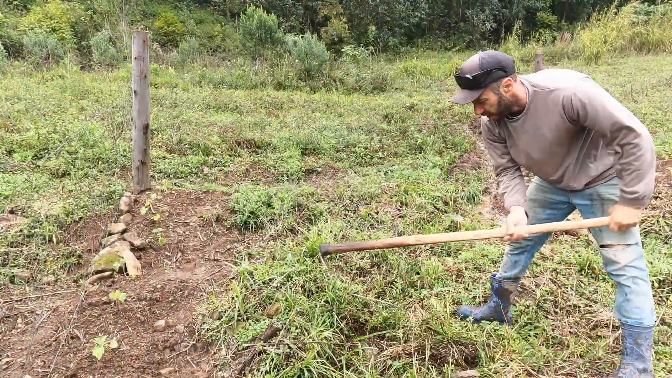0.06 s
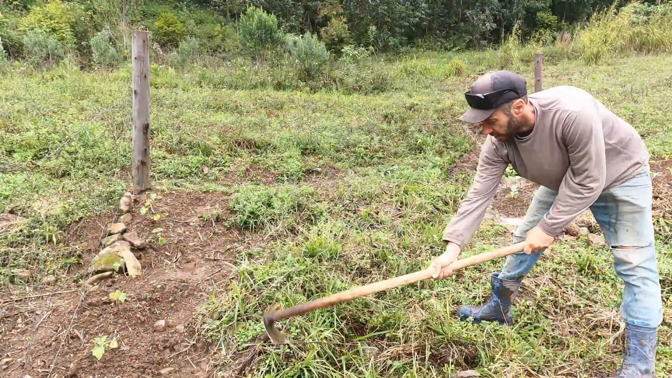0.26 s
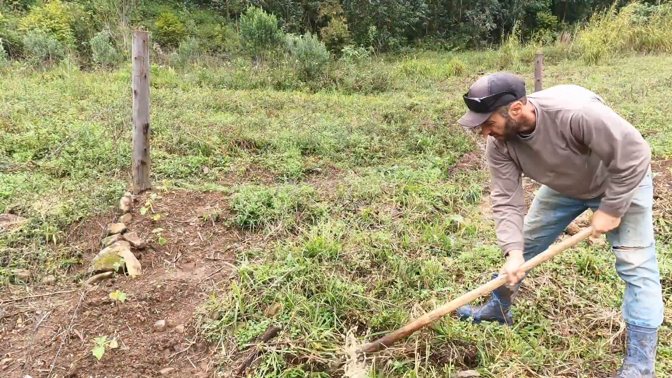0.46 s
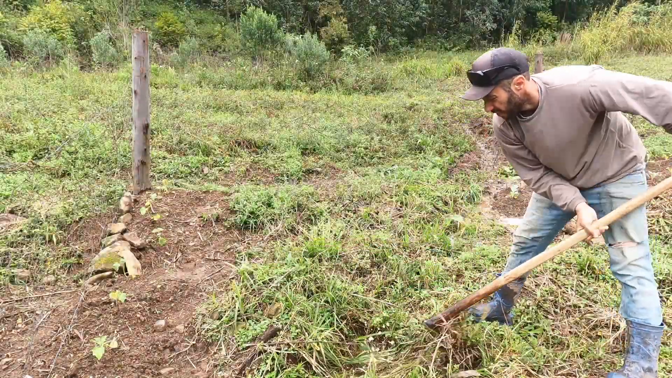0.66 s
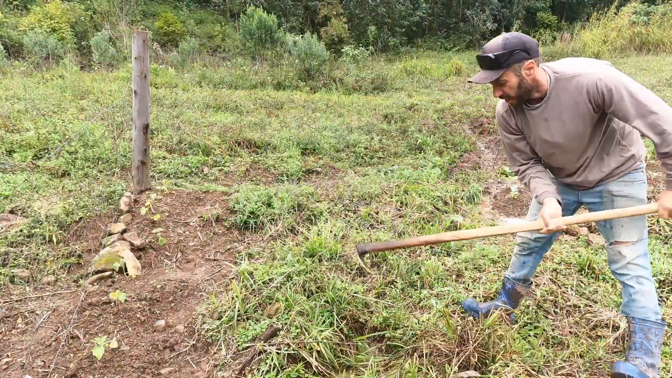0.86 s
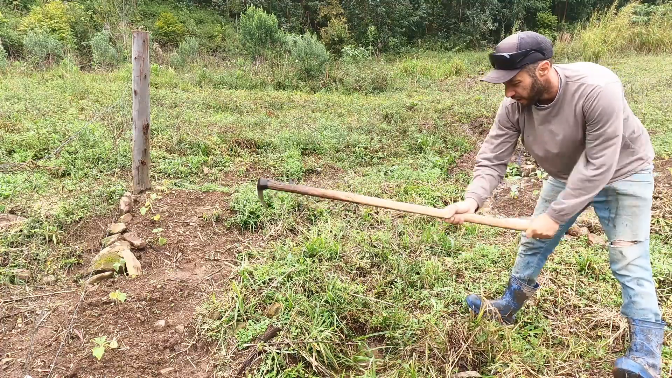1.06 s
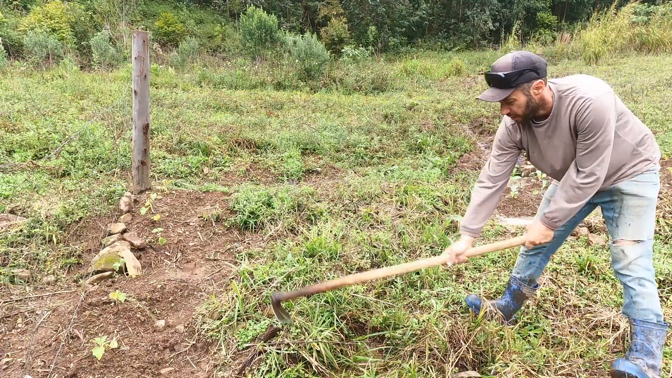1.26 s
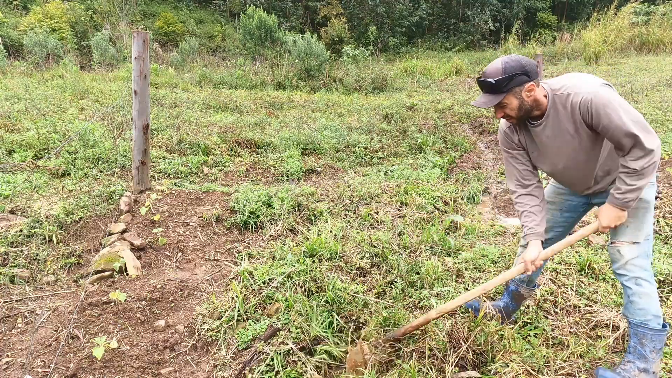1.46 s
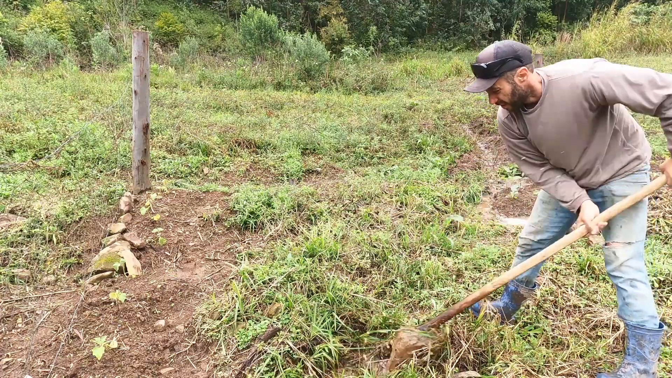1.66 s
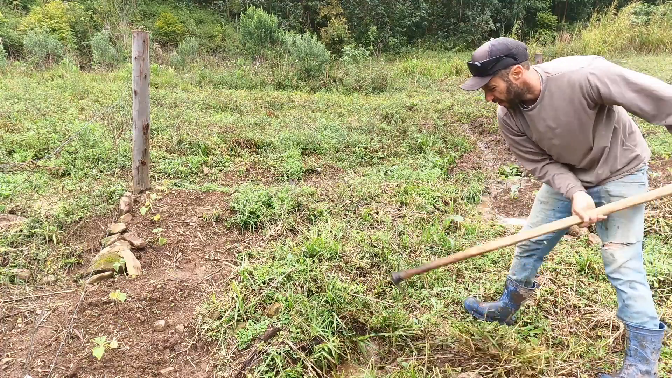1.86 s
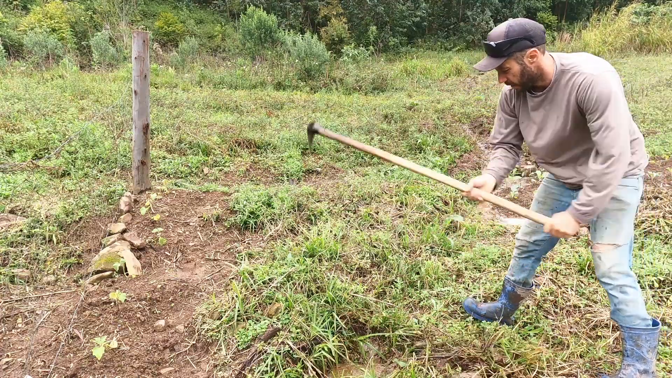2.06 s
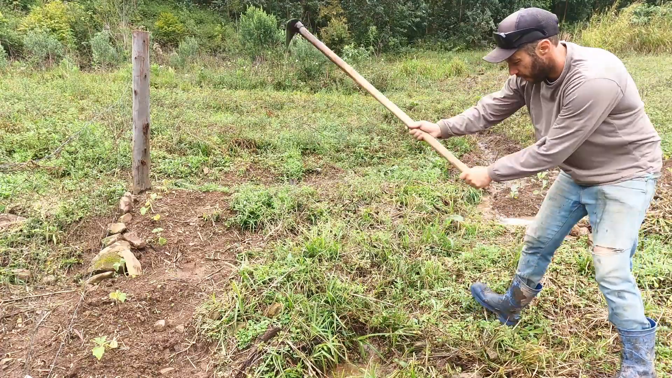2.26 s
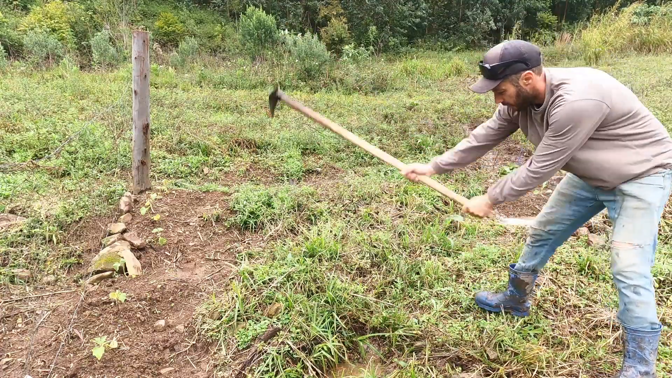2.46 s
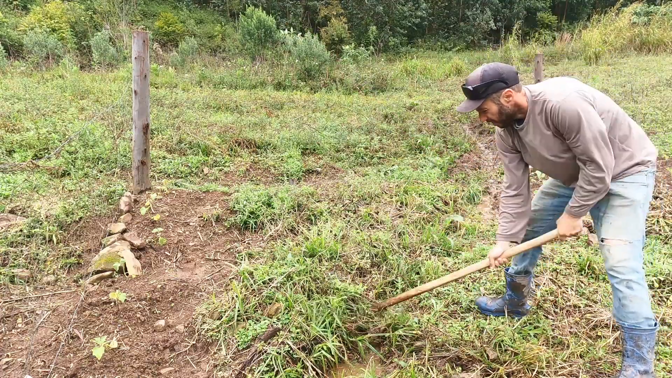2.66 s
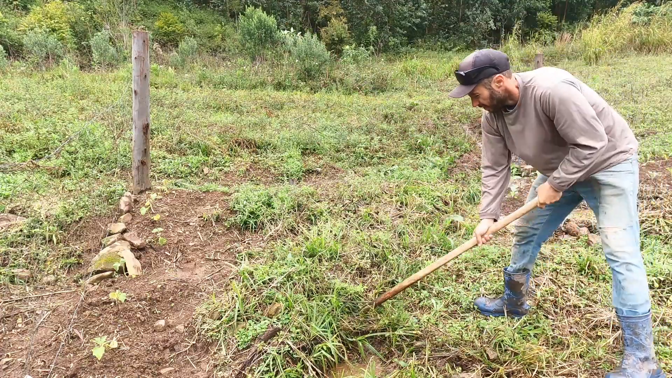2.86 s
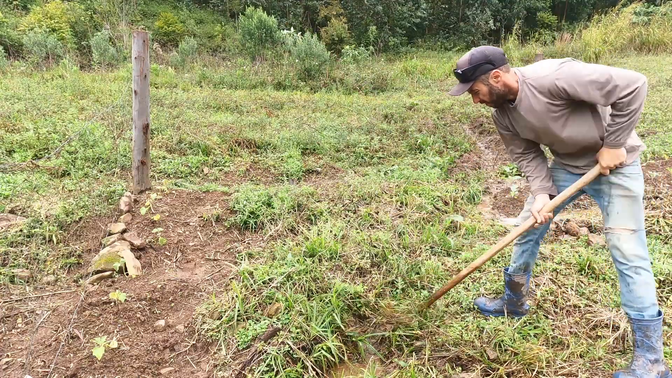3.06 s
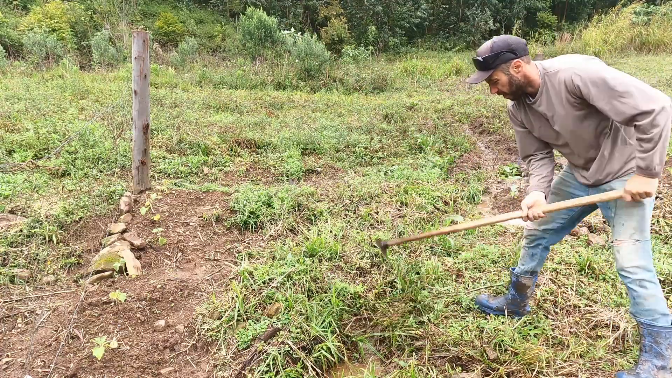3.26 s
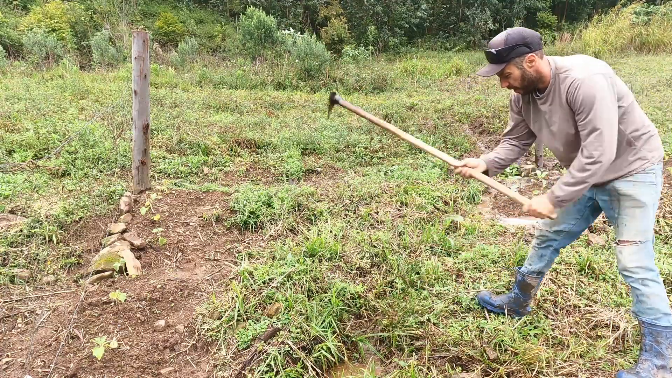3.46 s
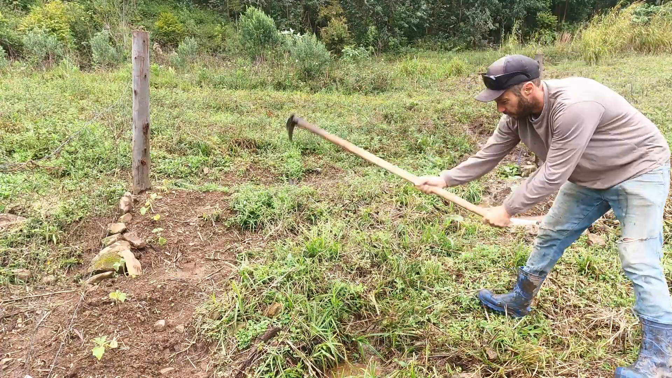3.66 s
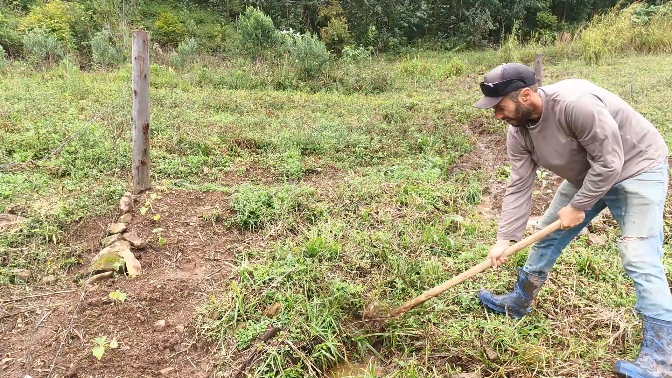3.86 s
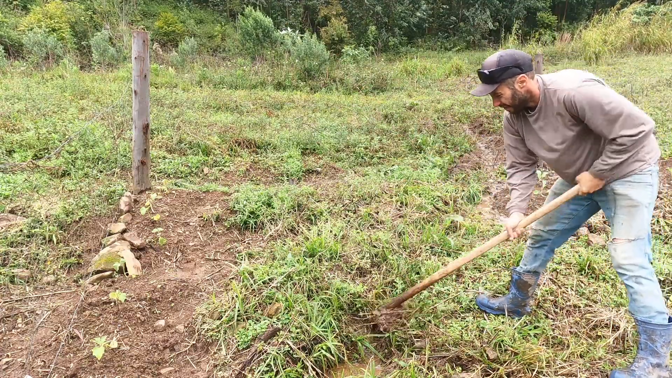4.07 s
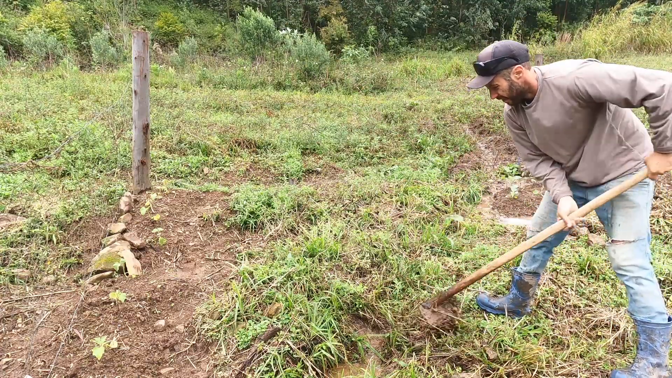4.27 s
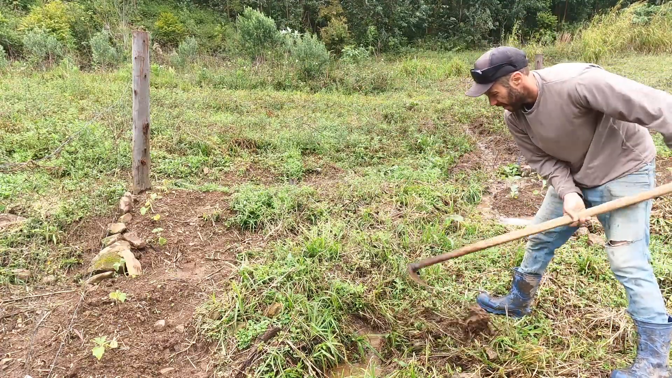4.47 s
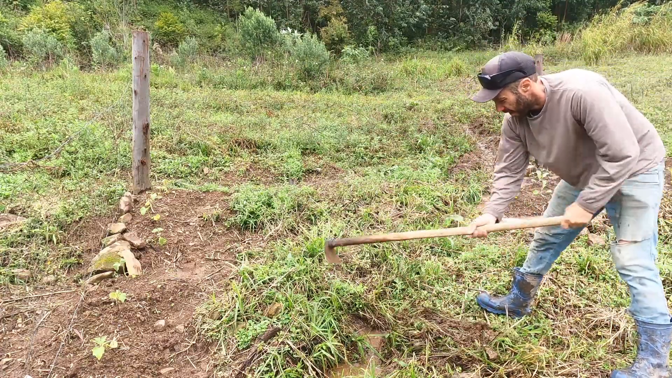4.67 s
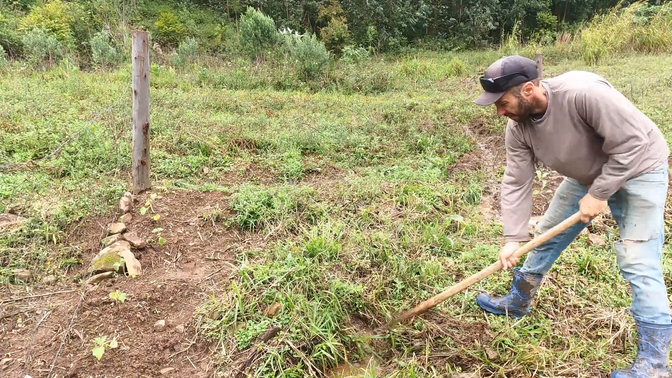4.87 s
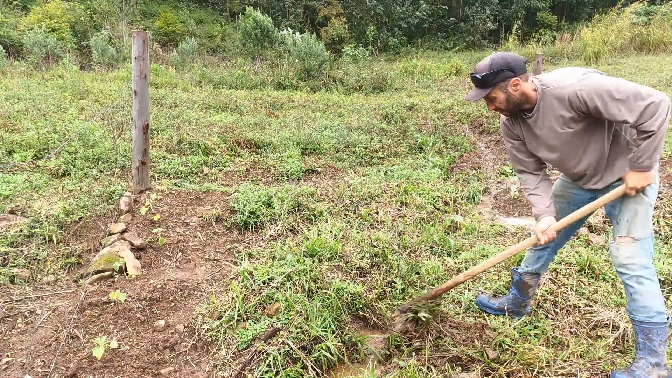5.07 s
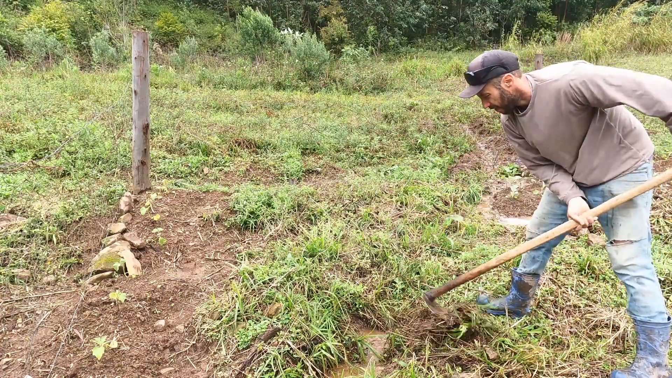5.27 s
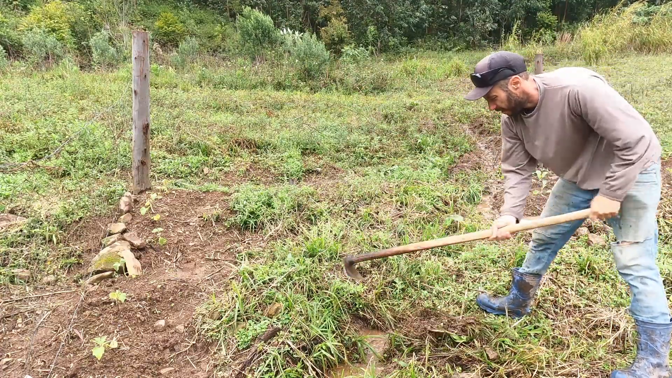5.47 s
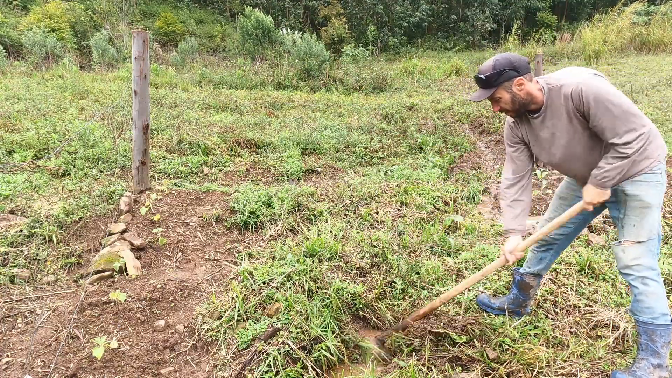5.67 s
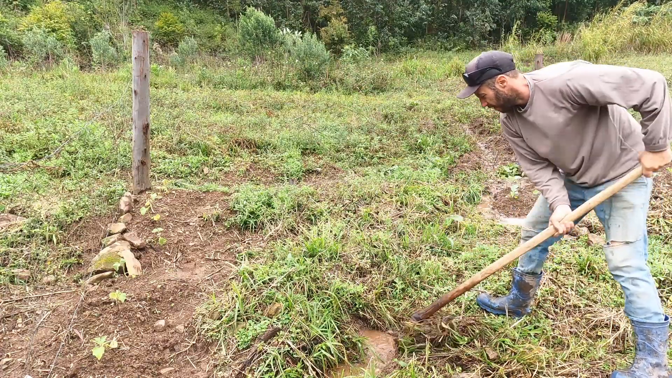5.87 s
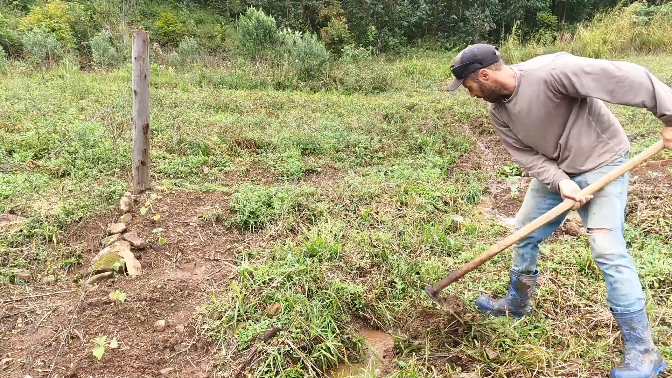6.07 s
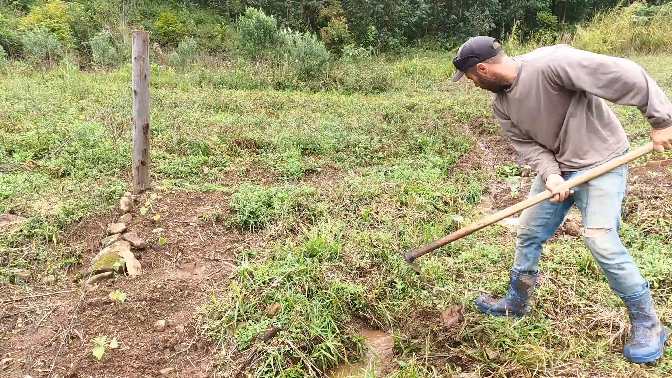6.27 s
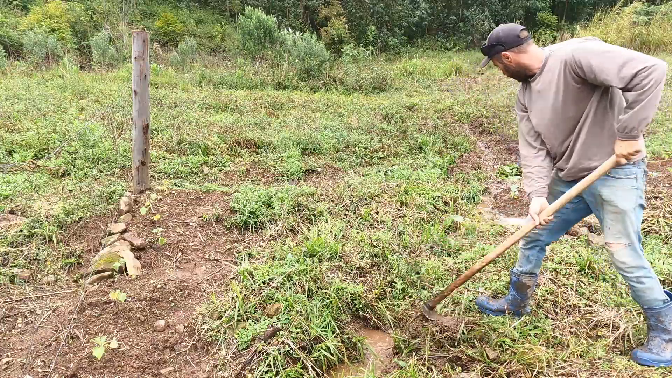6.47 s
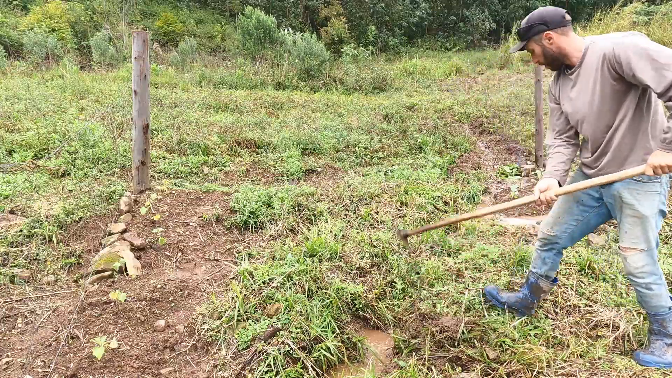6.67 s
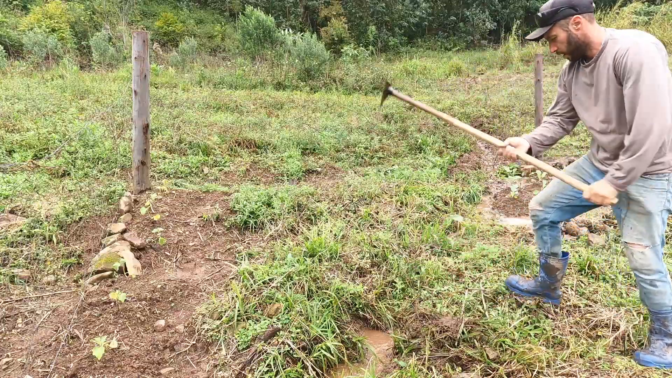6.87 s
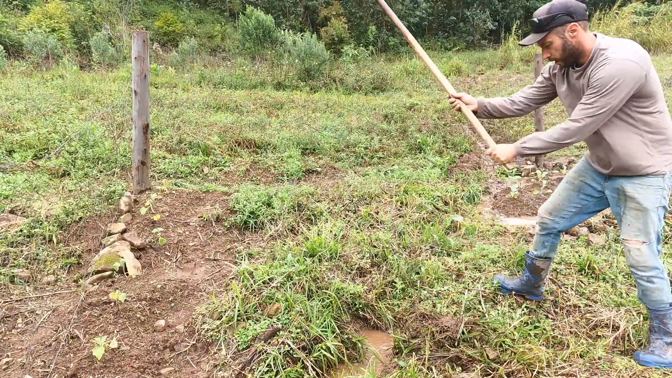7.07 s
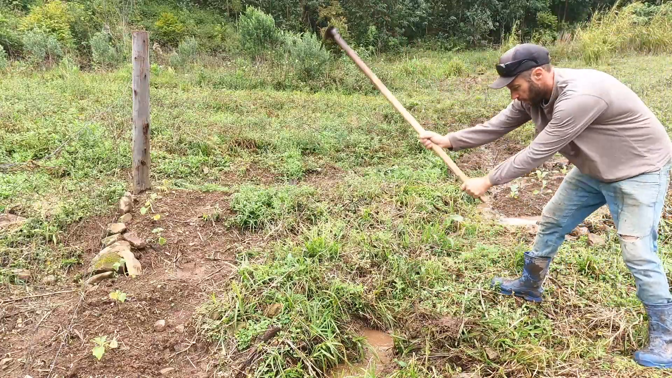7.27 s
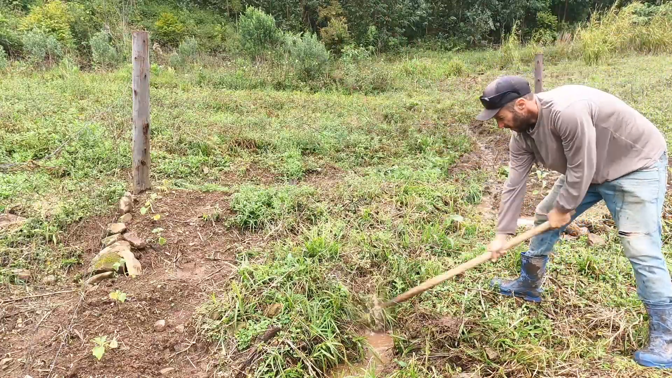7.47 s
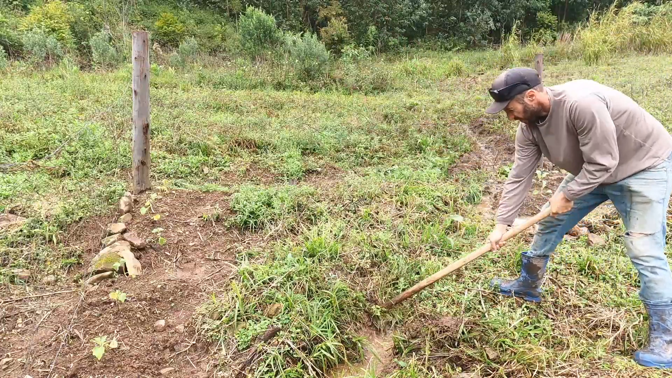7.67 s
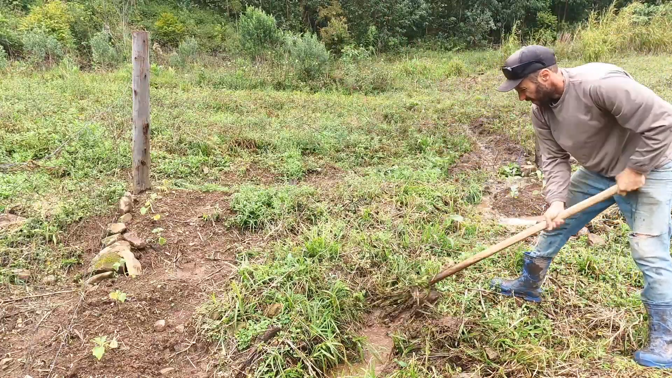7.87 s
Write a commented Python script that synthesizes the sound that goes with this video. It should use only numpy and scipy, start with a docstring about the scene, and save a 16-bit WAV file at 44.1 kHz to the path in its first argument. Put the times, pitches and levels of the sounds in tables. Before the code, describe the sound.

Wet, thudding hoe blows tear through turf at uneven intervals, followed by gritty scrapes, with early wind rumble, soft hiss and faint high birdsong.

```python
"""Wind buffets the microphone over a soft outdoor hiss, strongest in the first seconds; thin bird calls
sound throughout. A man chops seven times into wet, grassy soil with a hoe and drags the clods back, a few metres away.
Blows are bursts of tiny fractures plus ringing wet cavities and ground thumps; drags are shaped crackle.
Snaps, mud pockets and the chafing head are crackle through resonances; wind and hiss are shaped noise.
The sound starts wide and bright, then narrows and dulls."""
import sys
import numpy as np
from scipy import signal
from scipy.fft import rfft, irfft, next_fast_len
from scipy.io import wavfile
from scipy.ndimage import uniform_filter1d, map_coordinates

SR = 44100
rng = np.random.default_rng(int(sys.argv[2]) if len(sys.argv) > 2 else 0)


def transcribe(signal):
    """Save signal, clipped to [-1, 1], as a 16-bit WAV file at the path in sys.argv[1]."""
    frames = np.atleast_2d(signal).T
    limited = np.clip(frames, -1, 1)
    pcm = np.round(limited * 32767).astype(np.int16)
    wavfile.write(sys.argv[1], SR, pcm)


N = 349623
TIME_S = np.arange(N) / SR
HIT_S = TIME_S[:SR // 3]  # time axis of one short event
HIT_N = len(HIT_S)


def amp(db):
    """Decibels to gain."""
    return 10 ** (np.asarray(db) / 20)


def unit(x):
    """Scale to rms 1."""
    return x / np.sqrt(np.mean(x ** 2) + 1e-20)


def along(points, hz):
    """Read (Hz, value) points on a log axis."""
    f, v = np.transpose(points)
    return np.interp(np.log(hz + 1), np.log(f + 1), v)


def curve(rows, axis=1):
    """One column of a time table, per sample."""
    rows = np.asarray(rows)
    return np.interp(TIME_S, rows[:, 0], rows[:, axis])


def wobble(rate, size=N):
    """A smooth random curve with rate knots a second."""
    at = np.arange(size) * rate / SR
    knots = rng.standard_normal(int(at[-1]) + 4)
    return map_coordinates(knots, [at])


def filtered(x, response):
    """Multiply the spectrum of x by a function of frequency."""
    n = x.shape[-1]
    m = next_fast_len(n + 4096)
    spectrum = rfft(x, m) * response(np.fft.rfftfreq(m, 1 / SR))
    return irfft(spectrum, m)[..., :n]


def resonance(f, hz, q):
    """Causal response of one damped mode."""
    damping = 1j * f * hz / q
    return damping / (hz * hz - f * f + damping)


def crackle(rate, spread_db, size):
    """Tiny fractures at random moments, of randomly spread size and sign; rms 1."""
    sizes = amp(spread_db * np.minimum(rng.exponential(size=size), 4))
    return unit((rng.random(size) < rate / SR) * sizes * rng.choice([-1, 1], size))


def steadied(x, span):
    """Hold the rms near 1 over about span seconds, keeping the finer grain."""
    power = uniform_filter1d(x * x, max(int(span * SR), 2))
    return x / np.sqrt(np.abs(power) + np.mean(x * x) / 20)


def add(track, s, sound):
    """Mix a sound into the track from time s."""
    start = max(round(s * SR), 0)
    part = track[start:start + len(sound)]
    part += sound[:len(part)]


def swell(start, length, rise, sag_db_per_s, t60):
    """Gain of one push: a quick rise, a slowly sagging hold and a release."""
    t = np.maximum(TIME_S - start, 0)
    release_db = -60 * np.maximum(t - length, 0) / t60
    return np.minimum(t / rise, 1) * amp(-sag_db_per_s * t + release_db)


def sprinkle(spans, rate, db, spread_db, hz, octaves):
    """Small random events within each (start, level, length) span: rows of (s, peak dB, pitch Hz)."""
    rows = []
    for start, level, length, *_ in spans:
        when, size, pitch = rng.uniform(-1, 1, (3, 40))
        times = (np.arange(len(when)) + (1 + when) / 2) / rate  # one event at random in each slot
        for t, a, b in zip(times, size, pitch):
            if t < length:
                rows.append((start + t, level + db + spread_db * a, hz * 2 ** (octaves * b)))
    return rows


def scatter(x, t60):
    """Diffuse reflections from the ground and the plants, as a decaying noise tail."""
    tail = rng.standard_normal(HIT_N) * amp(-60 * HIT_S / t60) * (1 - np.exp(-HIT_S / 0.0016))
    return signal.fftconvolve(x, tail / np.linalg.norm(tail))[:N]


# open air: start_s, hiss_db, leaves_db
AIR_LEVELS = [(0, -52, -59.5), (.9, -53, -64), (1.3, -52, -61.5), (2.2, -47.5, -56), (3.3, -48.5, -58),
              (4.5, -52.5, -62), (5.5, -53, -61.5), (6.7, -52.5, -64.5), (7.9, -55, -59.5)]
# hiss spectrum: freq_hz, relative_db
HISS_SPECTRUM = [(20, -18), (80, -17), (250, 1), (500, 2.5), (900, -2), (1500, -2), (3000, -7.5),
                 (4300, -12), (5100, -12.5), (6800, -22.5), (7800, -30), (9500, -34), (12000, -52.5),
                 (15000, -63)]


def air():
    """An even, distant hiss, with leaves stirring when the breeze is up."""
    hiss = unit(filtered(rng.standard_normal(N), lambda f: amp(along(HISS_SPECTRUM, f))))
    rustling = crackle(rate=6000, spread_db=1, size=N)
    leaves = unit(filtered(rustling, lambda f: resonance(f, 2960, q=1.3) ** 2 / (1 + (f / 6500) ** 8)))
    hiss_gain = amp(curve(AIR_LEVELS) + 0.96 * wobble(rate=7.9))
    return hiss * hiss_gain + leaves * amp(curve(AIR_LEVELS, axis=2))


# gusts at the microphone: start_s, level_db, length_s
GUST_SPANS = [(.158, -31.5, 0.293), (0.503, -39, .07), (0.811, -43, 0.2), (0.999, -36.5, .17),
              (1.42, -36.5, 0.072), (1.489, -25.5, 0.36), (1.903, -29, 0.042), (1.976, -26, .16),
              (2.309, -34.5, 0.15), (2.482, -33.5, 0.11), (2.678, -30, 0.23), (2.991, -44.5, 0.31),
              (3.958, -44, 0.078), (5.805, -48.5, 0.073), (6.863, -45, 0.086)]
# light buffeting between gusts: start_s, level_db
BREEZE_LEVELS = [(0, -54), (.75, -59), (1.3, -51), (2.2, -48), (3.2, -45), (3.6, -54), (4.7, -60),
                 (5.6, -64), (6.5, -54), (7.9, -58)]
# buffeting spectrum: freq_hz, relative_db
BUFFET_SPECTRUM = [(20, -38.5), (45, -12), (90, -3.5), (160, 2), (270, -0.5), (400, -15), (600, -25),
                   (1000, -30), (2000, -54), (5000, -94.5)]
GUST_RISE_S, GUST_SAG_DB_PER_S, GUST_T60_S = 0.02, 20.5, 0.27
GUST_LUMPS_DB, LUMPS_PER_S = 2.5, 28  # a gust comes in uneven lumps


def wind():
    """Eddies hit the microphone as irregular low bumps; the hardest ones flutter higher."""
    pushes = [amp(db) * swell(s, length, GUST_RISE_S, GUST_SAG_DB_PER_S, GUST_T60_S)
              for s, db, length in GUST_SPANS]
    gusts = np.max(pushes, axis=0)
    breeze = amp(curve(BREEZE_LEVELS) + 4.7 * wobble(rate=17))
    lumps = amp(GUST_LUMPS_DB * wobble(rate=LUMPS_PER_S))
    level_db = 20 * np.log10(np.maximum(gusts * lumps, breeze))
    eddies = unit(crackle(rate=400, spread_db=2, size=N) + 0.61 * rng.standard_normal(N))
    rumble = steadied(filtered(eddies, lambda f: amp(along(BUFFET_SPECTRUM, f))), span=0.038)
    # fine turbulence rides on the pressure peaks
    turbulence = rumble ** 2 * rng.standard_normal(N)
    flutter = unit(filtered(turbulence, lambda f: resonance(f, 412, q=1) ** 3))
    force = np.clip((level_db + 54) / 22, 0, 1)
    return amp(level_db) * (rumble + amp(-13.0) * force * flutter)


# hardest eddies striking the microphone: near_peak_s, peak_db, pitch_hz
HARD_EDDIES = [(.171, -20.5, 258), (.187, -16, 392), (0.29, -20.5, 284), (.398, -27, 380),
               (1.093, -28.5, 430), (1.923, -20, 181), (2.023, -19, 400), (2.051, -16.5, 394),
               (2.128, -25, 470), (2.409, -26, 450), (2.507, -22.5, 219.5), (2.543, -19.5, 258),
               (2.769, -26.5, 500), (2.9, -23.5, 406), (3.148, -24.5, 171), (7.555, -31, 244)]
# lesser eddies during a gust; peak re gust level
EDDIES_PER_S, EDDY_DB, EDDY_SPREAD_DB, EDDY_HZ, EDDY_OCTAVES = 22, 3, 2.5, 320, 0.36


def bumps():
    """A hard eddy is one pressure kick that swings back once or twice, with a short puff of turbulence."""
    out = np.zeros(N)
    lesser = sprinkle(GUST_SPANS, EDDIES_PER_S, EDDY_DB, EDDY_SPREAD_DB, EDDY_HZ, EDDY_OCTAVES)
    for s, db, hz in HARD_EDDIES + lesser:
        pitch_hz = hz * (0.79 + 0.54 * np.exp(-HIT_S / 0.0028))
        swing = np.sin(2 * np.pi * np.cumsum(pitch_hz) / SR)
        puff = unit(filtered(rng.standard_normal(HIT_N), lambda f: resonance(f, 1.85 * hz, q=0.89) ** 3))
        envelope = (HIT_S * hz) ** 2 * np.exp(-2.6 * HIT_S * hz)
        kick = (swing + 0.08 * puff) * envelope
        add(out, s - .002, amp(db) * kick / np.abs(kick).max())
    return out


# pulls of the blade through earth and grass: start_s, level_db, length_s, crumbs_t60_s
PULL_SPANS = [(0.374, -46.5, .14, .3), (0.509, -38.5, 0.1, 0.67), (1.368, -43.5, 0.17, 0.93),
              (1.607, -42, 0.2, 1.4), (2.693, -51, 0.14, 0.55), (2.998, -42, 0.1, .7),
              (4.099, -52.5, 0.19, .8), (4.97, -53.5, 0.255, .7), (5.748, -47, 0.17, .5),
              (6.517, -51.5, .06, .4), (7.581, -56, 0.31, 0.95)]
# crumbling earth spectrum: freq_hz, relative_db
CRUMB_SPECTRUM = [(60, -33), (300, 12), (700, 1.5), (1300, 5.5), (2800, 4), (4500, 3.5), (6700, -9),
                  (7800, -17), (10500, -30), (14000, -35)]
PULL_RISE_S, PULL_SAG_DB_PER_S = .03, 3.5  # the blade takes up its load, then eases


def drag():
    """Grass rustles finely while coarser crumbs of several sizes tumble through it."""
    rustle = crackle(rate=5000, spread_db=3.6, size=N)
    crumbs = np.zeros(N)
    for hz in (850, 1520, 2570, 3330):
        tumbling = crackle(rate=160, spread_db=1.5, size=N)
        crumbs += unit(filtered(tumbling, lambda f: resonance(f, hz, q=1.43) ** 2))
    clumps = unit(amp(2.2 * wobble(rate=140)))
    earth = filtered(rustle + 0.27 * crumbs, lambda f: amp(along(CRUMB_SPECTRUM, f)))
    pulls = [amp(db) * swell(s, length, PULL_RISE_S, PULL_SAG_DB_PER_S, t60)
             for s, db, length, t60 in PULL_SPANS]
    effort = np.max(pulls, axis=0)
    return effort * steadied(earth, span=0.031) * clumps


# loudest stems snapping and stones ticking on the steel: start_s, peak_db, pitch_hz, t60_s
LOUD_SNAPS = [(.597, -27, 3030, 0.016), (.681, -32.5, 1420, 0.023), (1.641, -28.5, 2300, 0.019),
              (1.667, -25, 1890, .05), (1.778, -23.5, 1660, .06), (2.985, -20.5, 2817, 0.033),
              (3.073, -30, 2750, 0.017), (3.153, -33, 3000, 0.046), (4.656, -36.5, 870, 0.028),
              (4.963, -14, 2840, 0.015), (4.9636, -12.5, 1490, 0.025), (6.185, -38, 3720, .015),
              (6.532, -33.5, 3580, 0.042), (7.734, -30, 2430, 0.021), (7.738, -37, 1340, .033)]
# lesser snaps during a pull; peak re pull level
GRIT_PER_S, GRIT_DB, GRIT_SPREAD_DB = 70, 5, 3
GRIT_HZ, GRIT_OCTAVES, GRIT_T60_S = 2430, 0.77, 0.024


def snaps():
    """A sharp break and a quick spray of smaller ones, through one broad resonance, muffled by wet earth."""
    out = np.zeros(N)
    grit = sprinkle(PULL_SPANS, GRIT_PER_S, GRIT_DB, GRIT_SPREAD_DB, GRIT_HZ, GRIT_OCTAVES)
    for s, db, hz, t60 in LOUD_SNAPS + [(*row, GRIT_T60_S) for row in grit]:
        breaks = crackle(rate=5000, spread_db=-1.0, size=HIT_N) * amp(-60 * HIT_S / t60)
        breaks[0] += 4
        tick = filtered(breaks, lambda f: resonance(f, hz, q=2.3) ** 2 / (1 + (f / 6000) ** 4))
        add(out, s, amp(db) * tick / np.abs(tick).max())
    return out


# blade tearing into turf: peak_s, level_db, rise_s, t60_s, tilt_db_per_octave, slit_hz, brush_db (re level)
BLADE_CUTS = [(.432, -21.5, 0.0059, 0.082, 2, 1310, -9), (1.393, -23, 0.0044, 0.048, 1.5, 1300, -21),
              (1.428, -22, 0.011, .075, 1.5, 700, -18), (2.699, -19, .015, 0.073, 1, 3660, -32),
              (3.898, -19, 0.0018, 0.073, -0.5, 930, -14), (4.9638, -23, 0.0028, 0.066, -1.5, 1740, -23),
              (5.780, -24.5, .0019, 0.066, -.5, 1810, -17), (7.586, -22, 0.014, 0.083, 2, 1820, -24.5),
              (7.601, -24.5, .005, 0.038, 0, 870, -30)]
# tearing turf spectrum: freq_hz, relative_db
TURF_SPECTRUM = [(40, -32), (95, -11), (150, 4.5), (400, -2), (900, 3.5), (1600, 1), (3000, 1),
                 (4500, -6.5), (6700, -17), (7800, -29), (10000, -36), (13000, -50), (15000, -45)]
# swell of the grass before the bite; crumbs after it (re level)
BRUSH_DB_PER_S, TRAIL_DB, TRAIL_T60_S = 700, -26, .4


def cuts():
    """Stems and roots tear ever louder as the blade enters, then die away as the soil brakes it."""
    out = np.zeros(N)
    t = HIT_S - .05  # zero at the peak
    for s, db, rise, t60, tilt, hz, brush_db in BLADE_CUTS:
        slit = lambda f: 1 + 1.18 * resonance(f, hz, q=10.5)
        tilt_db = lambda f: tilt * np.log2(np.clip(f, 300, 12000) / 2000)
        colour = lambda f: slit(f) * amp(along(TURF_SPECTRUM, f) + tilt_db(f))
        fractures = crackle(rate=6000, spread_db=2.5, size=HIT_N)
        tearing = steadied(filtered(fractures, colour), span=0.0056)
        # the blade parts the grass just before it bites
        brushing = amp(brush_db + np.minimum(t + rise, 0) * BRUSH_DB_PER_S)
        entering = np.maximum(np.clip(1 + t / rise, 0, 1) ** 1.03, brushing)
        after = np.maximum(t, 0)
        crumb_trail = amp(TRAIL_DB - 60 * after / TRAIL_T60_S)
        braking = amp(-60 * after / t60) + crumb_trail
        add(out, s + t[0], amp(db) * entering * braking * tearing)
    # high-pass at 110 Hz
    return filtered(out, lambda f: (f / 110) ** 2 / ((f / 110) ** 2 - 1 - 1.2j * f / 110))


# blade seating, clods landing, air pockets closing in mud:
# start_s, level_db, pitch_hz, t60_s, thump_db (re level)
WET_PLOPS = [(.4429, -6.5, 556, 0.027, -19.5), (.463, -23.5, 643, 0.13, -27),
             (1.433, -13.5, 695, 0.067, -21), (1.452, -21, 617, 0.11, -11), (1.503, -23.5, 680, 0.041, -8),
             (1.640, -18, 875, .03, -9), (2.7042, -18.5, 710, 0.076, -10), (2.987, -15, 543, 0.047, -33),
             (3.9033, -7, 520, 0.035, -2.5), (3.945, -28, 620, .06, -16), (4.966, -27, 550, 0.12, -6.5),
             (5.782, -30, 480, 0.053, 5), (7.585, -14, 526, 0.056, -2.5), (7.598, -17, 803, 0.039, -3.5)]
GROUND_HZ, GROUND_OCT_PER_DB = 94, 0.01  # pitch a full-scale thump settles to; lighter blows sound higher


def plops():
    """A wet cavity rings briefly, sinking in pitch as it opens, over a dull push of the ground."""
    out = np.zeros(N)
    for s, db, hz, t60, thump_db in WET_PLOPS:
        pitch_hz = hz * (1 + 0.57 * np.exp(-HIT_S / 0.0018) + 0.1 * wobble(rate=320, size=HIT_N))
        cavity = np.sin(2 * np.pi * np.cumsum(pitch_hz) / SR)
        splat = filtered(rng.standard_normal(HIT_N), lambda f: resonance(f, hz, q=1.19) ** 2)
        wet_envelope = amp(-60 * HIT_S / t60) * (1 - np.exp(-HIT_S / 0.0012))
        wet = (0.58 * cavity + 0.57 * steadied(splat, span=0.0051)) * wet_envelope
        settled_hz = GROUND_HZ * 2 ** (-GROUND_OCT_PER_DB * (db + thump_db))
        ground_hz = settled_hz + 170 * np.exp(-HIT_S / 0.0078)  # the sod slackens as it gives
        ground = np.sin(2 * np.pi * np.cumsum(ground_hz) / SR)
        push = ground * amp(thump_db - 60 * HIT_S / 0.042) * (1 - np.exp(-HIT_S / 0.0022))
        add(out, s, amp(db) * (wet + push))
    return out


# one bird repeats the same falling note: start_s
WHISTLE_STARTS = [.84, 1.45, 3.27, 3.83, 4.53, 5.12, 6.32, 7.48]
# other short bird chirps, rising or falling, before the loss over distance:
# start_s, level_db, length_s, start_hz, end_hz
OTHER_CHIRPS = [(1.921, -46, 0.068, 5800, 6230), (2.164, -43, 0.017, 6950, 5330),
                (2.495, -48.5, 0.059, 5480, 5040), (3.513, -42, 0.03, 5340, 5760),
                (4.135, -43, 0.026, 5600, 5780), (6.558, -54, 0.047, 5860, 6270),
                (7.275, -59, .06, 6600, 5300)]
# the falling note, before the loss over distance
WHISTLE_DB, WHISTLE_S, WHISTLE_FROM_HZ, WHISTLE_TO_HZ = -59, .11, 6720, 6260


def birds():
    """Thin, wavering whistles that glide quickly and level off."""
    out = np.zeros(N)
    whistles = [(s, WHISTLE_DB, WHISTLE_S, WHISTLE_FROM_HZ, WHISTLE_TO_HZ) for s in WHISTLE_STARTS]
    for s, db, length, start_hz, end_hz in whistles + OTHER_CHIRPS:
        u = np.minimum(HIT_S / length, 1)
        glide_hz = end_hz + (start_hz - end_hz) * (1 - u) ** 1.4
        pitch_hz = glide_hz + 110 * wobble(rate=400, size=HIT_N)
        waver_db = 3 * wobble(rate=140, size=HIT_N)
        tone = np.sin(2 * np.pi * np.cumsum(pitch_hz) / SR)
        add(out, s, amp(db + waver_db) * np.sin(np.pi * u) * tone)
    return out


# waterlogged earth sucking at the blade: start_s, level_db, length_s, pitch_hz
MUD_SQUELCHES = [(4.067, -45.5, 0.11, 344), (5.001, -48.5, .14, 574), (5.793, -46.5, 0.15, 724),
                 (6.301, -54.5, 0.35, 633), (7.826, -38.5, 0.051, 413)]


def squelches():
    """A cluster of small pockets opens in the mud as the blade pulls free."""
    out = np.zeros(N)
    for s, db, length, hz in MUD_SQUELCHES:
        pops = crackle(rate=1200, spread_db=1, size=HIT_N)
        pockets = filtered(pops, lambda f: resonance(f, hz, q=1.3) ** 2)
        arch = np.sin(np.pi * np.minimum(HIT_S / length, 1))
        add(out, s, amp(db) * steadied(pockets, span=0.047) * arch)
    return out


# head chafing on the handle in the downswing: start_s, level_db, length_s, low_hz, high_hz
HANDLE_CHAFES = [(4.91, -39.5, 0.026, 985, 3630), (5.696, -40.5, .016, 2970, 3040)]


def chafes():
    """Steel slips on wood in a short, rough squeak: uneven slips ring two resonances and buzz between them."""
    out = np.zeros(N)
    for s, db, length, low_hz, high_hz in HANDLE_CHAFES:
        slips = crackle(rate=2500, spread_db=2, size=HIT_N)
        ring = lambda hz, q: steadied(filtered(slips, lambda f: resonance(f, hz, q) ** 2), span=0.013)
        buzz = ring(np.sqrt(low_hz * high_hz), q=0.88)
        squeak = ring(low_hz, q=8) + 0.79 * ring(high_hz, q=13) + 0.77 * buzz
        release_db = -60 * np.maximum(HIT_S - 0.61 * length, 0) / .03
        grip = np.minimum(HIT_S / .001, 1) * amp(release_db)
        muffled = filtered(squeak, lambda f: 1 / (1 + (f / 6000) ** 6))
        add(out, s, amp(db) * unit(muffled) * grip)
    return out


# stereo width and treble: start_s, side_db, top_db
IMAGE_CURVE = [(0, -8.5, 2.5), (.55, -8, 9), (.9, -14, -5), (1.4, -28.5, -11.5), (2, -59, -10),
               (3, -51, -8), (7.9, -43, -5.5)]
LEAN, WIDTH_DB = 0.2, -2  # lean of the wide image to the right; its unrelated part
PORT_DB, PORT_HZ, PORT_LAG_RAD = 4.5, 430, .5  # wind strikes the right port harder and a little later


def scene():
    """All sources lie ahead; the two channels differ only as far as the image is wide."""
    hoe = cuts() + plops() + snaps() + chafes() + squelches() + drag()
    calls = birds()
    far_birds = amp(-8.5) * calls + amp(-9) * scatter(calls, t60=0.11)
    buffet = wind() + bumps()
    mid = hoe + amp(-12.5) * scatter(hoe, t60=0.16) + far_birds + buffet + air()
    unrelated = amp(-2.0) * scatter(hoe, t60=.02) + wind() + air()
    port = lambda f: np.abs(resonance(f, PORT_HZ, q=.8)) * np.exp(-1j * PORT_LAG_RAD)
    windward = filtered(buffet, port)
    wide = amp(WIDTH_DB) * unrelated - LEAN * mid - amp(PORT_DB) * windward
    side = amp(curve(IMAGE_CURVE)) * wide
    return np.array([mid + side, mid - side])


TOP_HZ = 15000


def record(dry):
    """The treble above about 7 kHz is brighter at first; nothing passes the band limit."""
    top = filtered(dry, lambda f: np.clip((f - 6800) / 1000, 0, 1) / (1 + (f / 11000) ** 8))
    coloured = dry + top * (amp(curve(IMAGE_CURVE, axis=2)) - 1)
    return filtered(coloured, lambda f: 1 / (1 + (f / 12500) ** 8) * (f < TOP_HZ))


dry = scene()
out = record(dry)
transcribe(out)
```